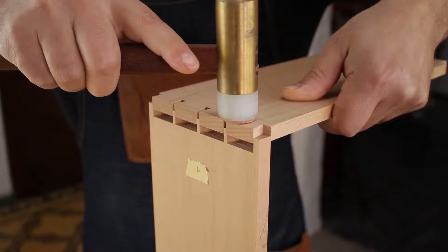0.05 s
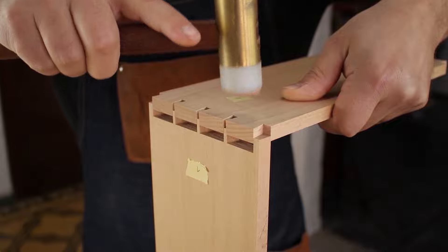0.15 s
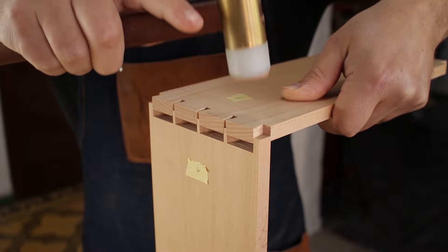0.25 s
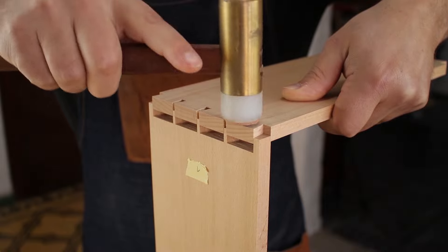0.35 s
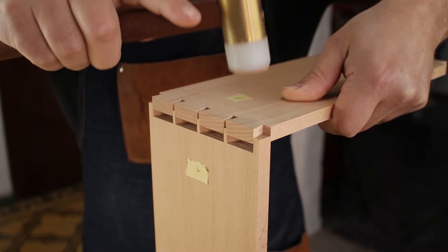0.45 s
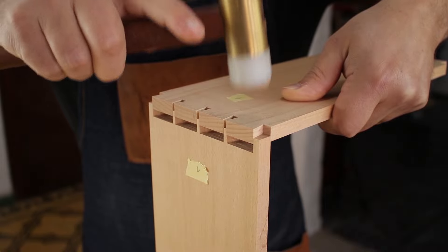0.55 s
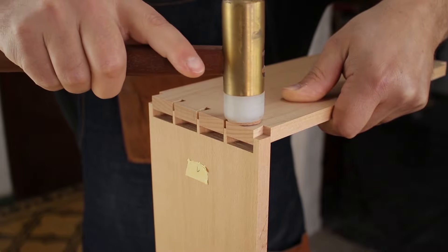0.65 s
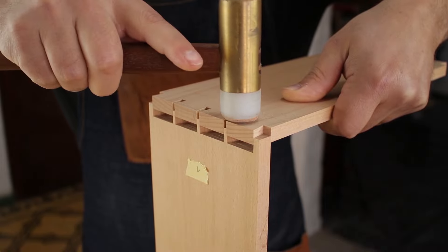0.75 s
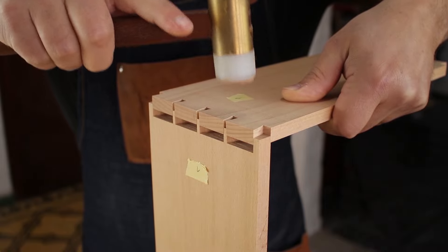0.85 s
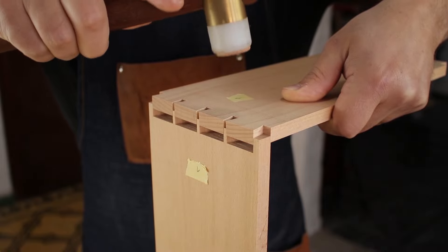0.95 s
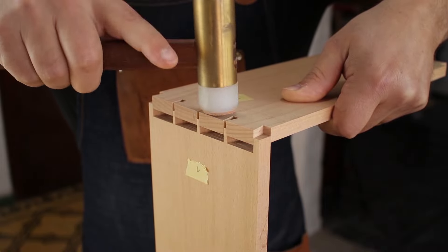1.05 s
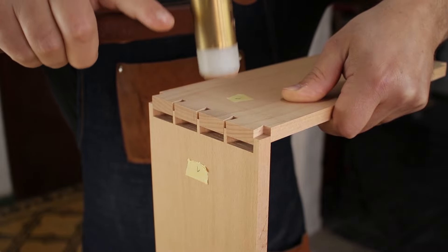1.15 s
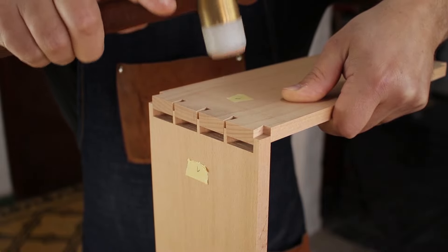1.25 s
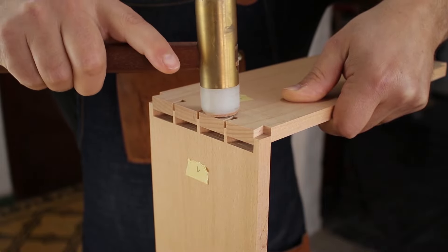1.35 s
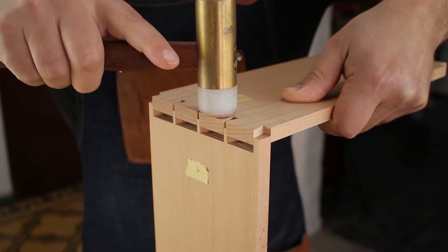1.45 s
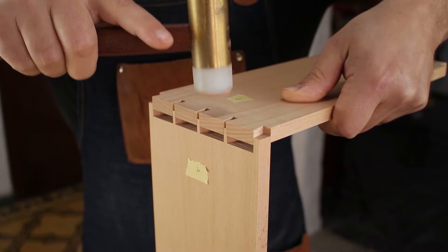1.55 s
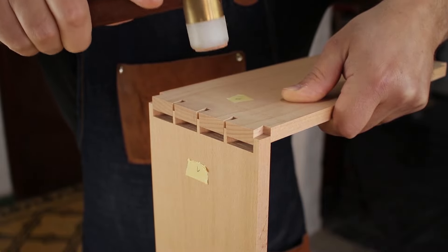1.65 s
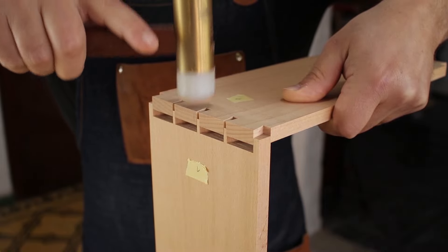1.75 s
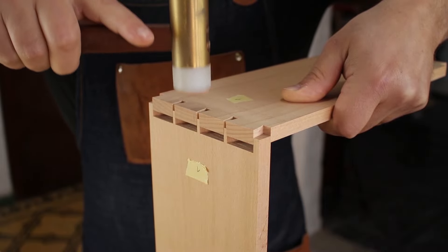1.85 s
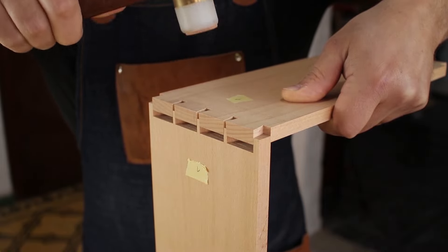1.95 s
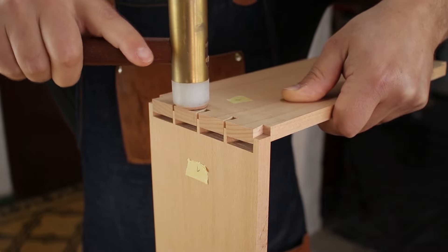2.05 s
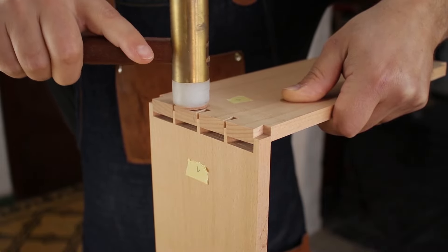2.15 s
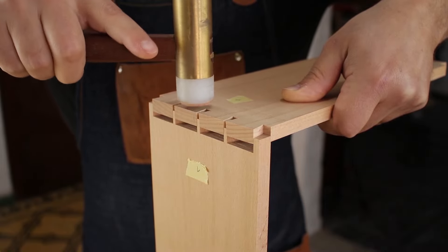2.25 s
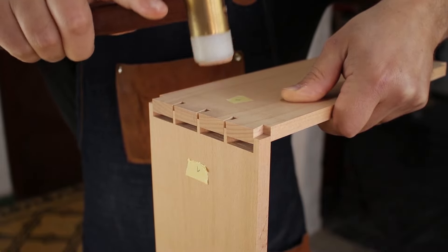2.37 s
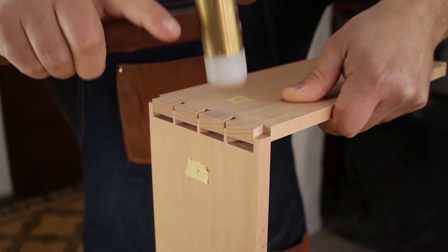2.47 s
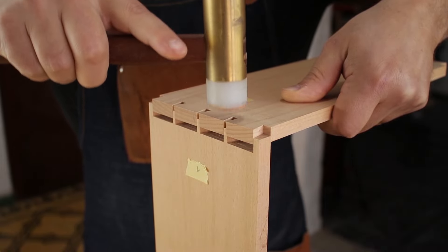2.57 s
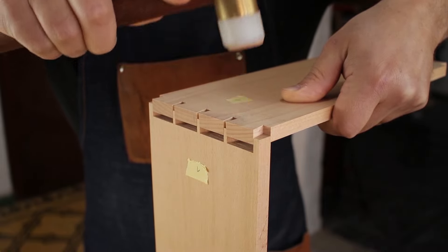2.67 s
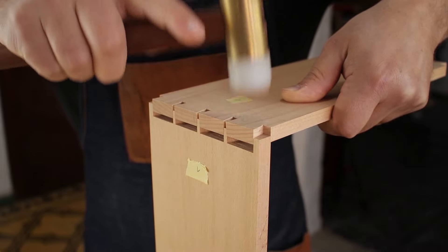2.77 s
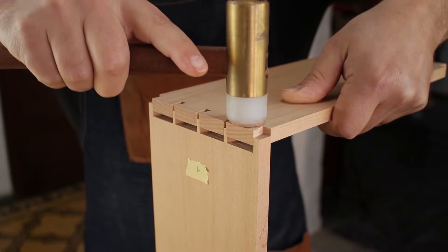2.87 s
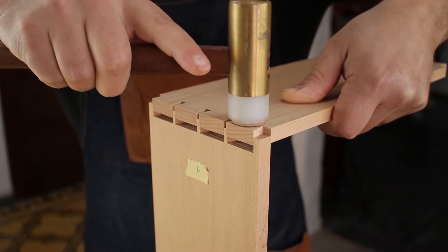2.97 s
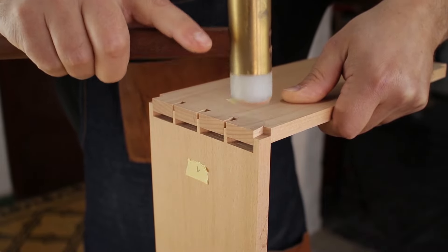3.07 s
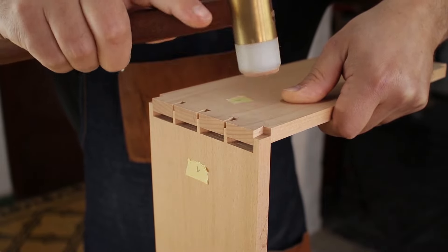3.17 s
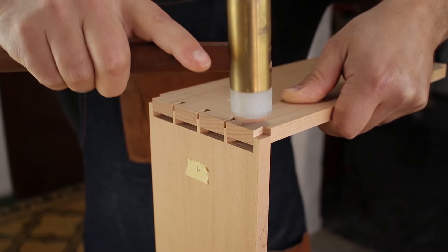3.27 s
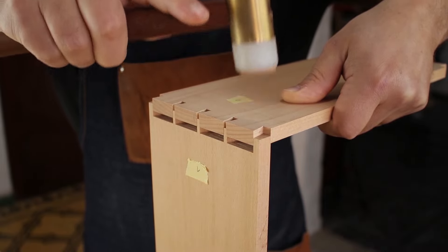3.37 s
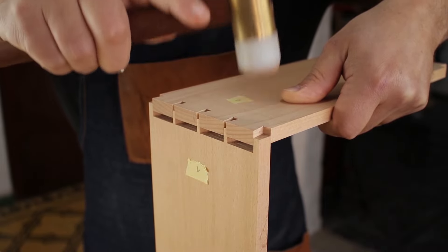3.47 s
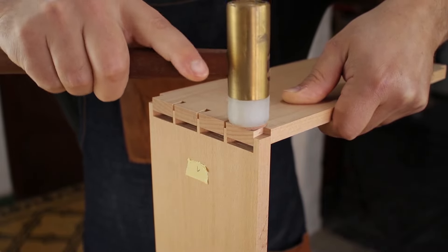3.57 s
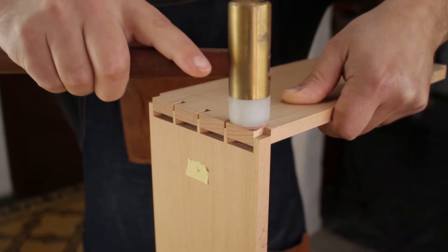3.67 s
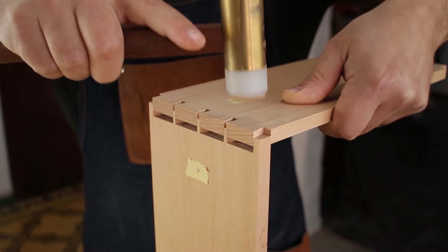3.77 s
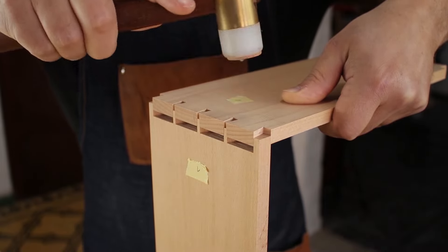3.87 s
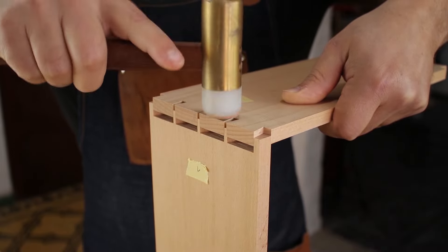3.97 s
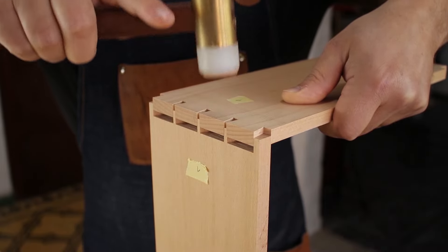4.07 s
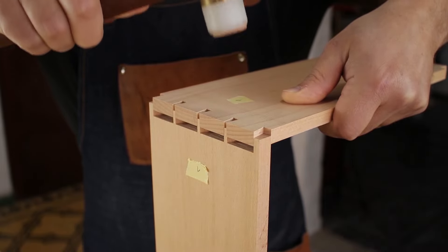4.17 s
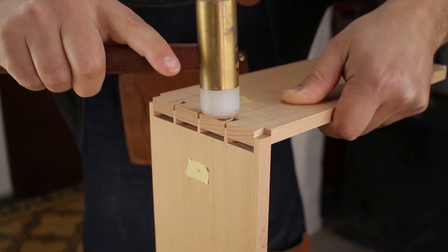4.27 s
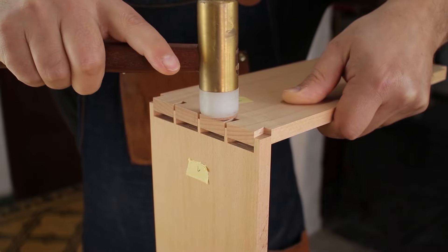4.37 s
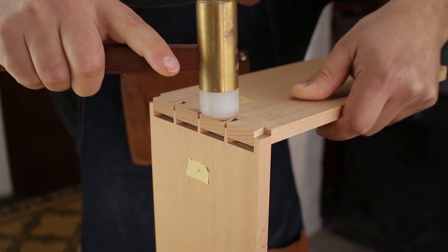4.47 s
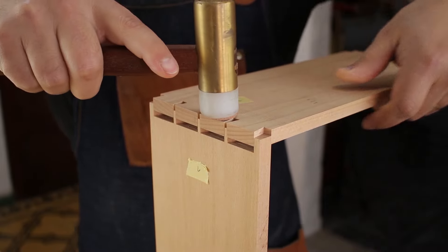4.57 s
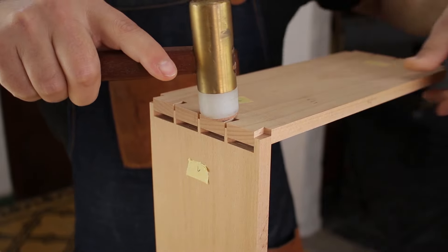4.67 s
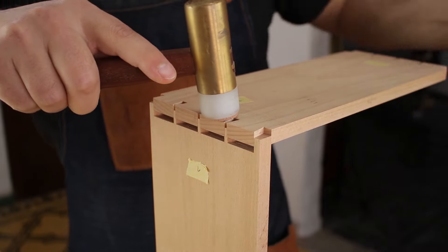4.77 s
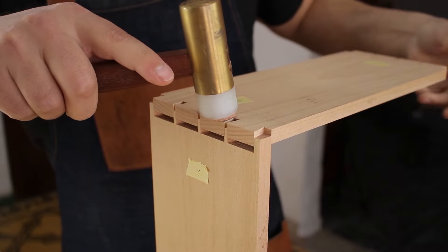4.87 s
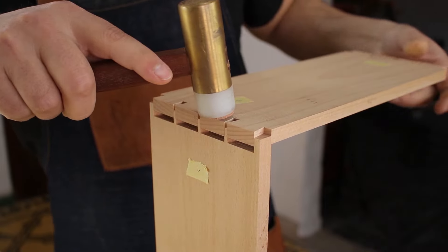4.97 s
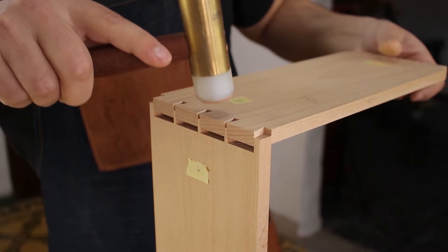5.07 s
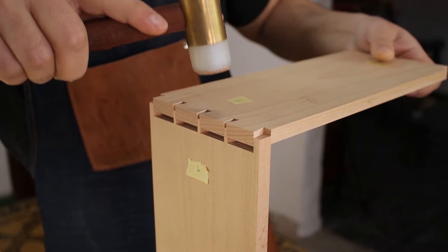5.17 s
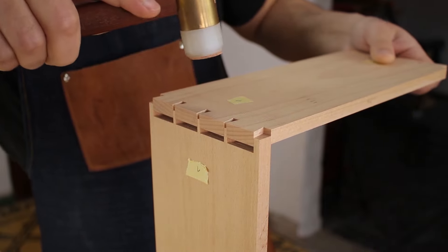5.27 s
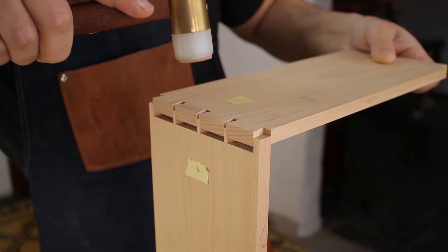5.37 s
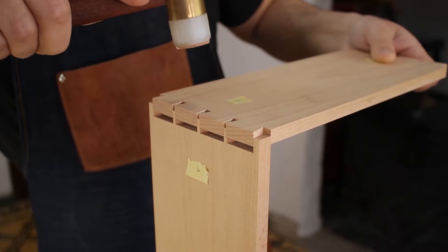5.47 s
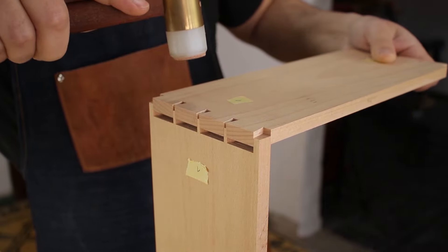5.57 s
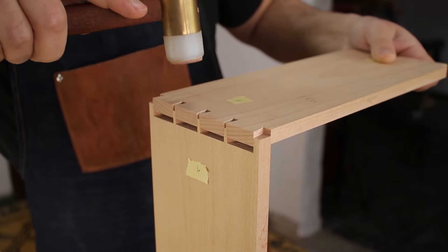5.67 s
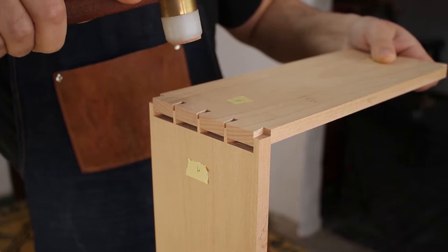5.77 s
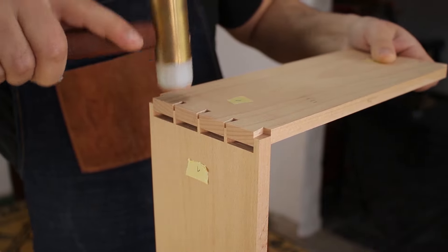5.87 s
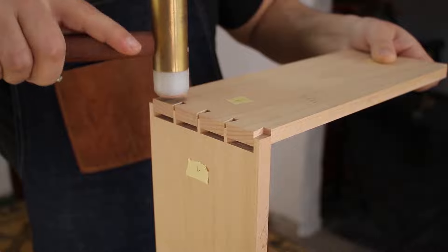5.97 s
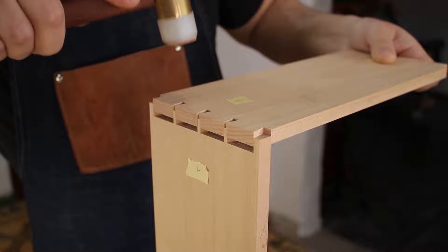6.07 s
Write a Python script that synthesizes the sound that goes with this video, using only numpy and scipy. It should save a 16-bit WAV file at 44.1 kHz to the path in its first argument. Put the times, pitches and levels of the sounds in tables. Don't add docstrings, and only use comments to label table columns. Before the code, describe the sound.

Close, loud mallet knocks on thin wooden boards in a bare, reverberant workshop. Thirteen or so blows come in a lopsided rhythm, alternating short and longer gaps, varying between hollow knock and bright snap, slightly clipped at the peaks. After the last strong hit the echo dies away, leaving soft room air and a far bird's tiny falling whistles, before a final lighter knock.

```python
import sys
import numpy as np
from scipy import signal
from scipy.fft import rfft, irfft
from scipy.io import wavfile
from scipy.ndimage import uniform_filter1d, map_coordinates

SR = 44100
rng = np.random.default_rng(int(sys.argv[2]) if len(sys.argv) > 2 else 0)


def elevation(decibels):
    levels = np.asarray(decibels, float)
    return 10 ** (levels / 20)


def unload_audio(sound):
    columns = np.transpose(np.atleast_2d(sound))
    steps = np.round(np.clip(columns, -1, 1) * 32767)
    wavfile.write(sys.argv[1], SR, steps.astype(np.int16))


N = 270333

# (frequency [Hz], t60 [s])
ROOM_DECAY = [(60, 0.81), (160, 1.2), (420, 1.003), (1100, 0.89), (2910, 0.82), (7680, 0.64), (14000, 0.36)]


def mallet(waves):
    # (time [s], force [dB], face snap over force [dB], joint modes over force [dB], tail pitch [Hz])
    blows = [(-.04, -15, 10, 6.5, 3730), (0.4091, -15.5, 9.5, 6, 3470), (0.6842, -14.5, 7.5, 8.5, 3220),
             (1.1347, -16, 9.5, 4.5, 3250), (1.4087, -12, 9.5, 5, 3300), (1.8695, -14, 2.5, 4.5, 3370),
             (2.155, -11.5, 3, 5, 2100), (2.6134, -16.5, 3, -2, 2685), (2.8983, -13.5, 10, 10, 3360),
             (3.3458, -12.5, -6.5, 1.5, 3195), (3.6134, -12.5, 11.5, 11, 3560),
             (4.0717, -16, 10.5, 3.5, 3260), (4.3423, -10.5, 8, 7, 3510), (5.9957, -21.5, 9.5, 12.5, 3150)]
    # (middle modes over force [dB], bench thud [dB], favoured deep mode [Hz],
    # first crack over snap [dB])
    spots = [(.6, -24.5, 310, -13), (1.2, -31.5, 370, -13.5), (2.2, -24, 350, -11.5), (11, -29, 295, -1.5)]
    out = np.zeros(N + 4 * SR)
    for k, (s, *how) in enumerate(blows):
        levels, landing, contact = strike(spots[k % len(spots)], s, *how)
        direct, spread = blow(levels, landing, contact)
        echo = elevation(1) * room(spread, waves)
        start = SR + round((s - 0.0008) * SR)
        out[start:start + len(direct)] += direct
        out[start:start + len(echo)] += echo
    return out[SR:SR + N]


def strike(spot, s, force_db, snap_db, joint_db, tail_hz):
    # (time [s], upper modes over force [dB], their favoured pitch [Hz], low knock [dB])
    looseness = [(0, 13, 1255, -4), (0.699, 10.5, 1320, -1.3), (1.3, 11.5, 1297, 2.4), (2.1, 7, 1370, -0.4),
                 (2.6, 11, 1380, -1.5), (3.5, 3.5, 1290, -2.5), (4.05, 6, 1237, -4.5), (4.35, 9, 1258, -5),
                 (6, 11.5, 1240, -12)]
    middle_db, thud_db, deep_hz, crack_db = spot
    times, *columns = np.transpose(looseness)
    upper_db, upper_hz, low_knock_db = [np.interp(s, times, c) for c in columns]
    levels = force_db + np.array([snap_db, 0, middle_db, upper_db, joint_db])
    face_hz = 2.5 * tail_hz
    landing = (thud_db, crack_db, deep_hz, upper_hz, tail_hz, face_hz)
    high_knock_db = -0.3 + 0.56 * levels[-1]
    low_knock_hz, contact_s = 1370, 0.0049
    contact = (low_knock_db, low_knock_hz, high_knock_db, tail_hz, contact_s)
    return levels, landing, contact


def blow(levels, landing, contact):
    # (frequency [Hz], level [dB], t60 [s])
    bench_modes = [(45, -9.5, 0.027), (83, -5, 0.12), (124.5, -3.5, .12)]
    deep_modes = [(244.1, 0.5, 0.074), (339, 3, 0.042), (387, -3, 0.1), (491, -7.5, 0.11), (590, -5, 0.04)]
    middle_modes = [(817.9, -5, 0.075), (910, -8, .04)]
    upper_modes = [(1245, -2, 0.021), (1330.4, -0.5, 0.022), (1389.5, -2.5, 0.038), (1616, 1.5, 0.019),
                   (1753, -4, 0.02)]
    joint_modes = [(2143, 3.5, 0.014), (2463, 5.5, 0.014), (2744, 2, 0.019), (3130, -5, 0.013),
                   (3510, -4.5, 0.038), (3697, 0.5, 0.019), (4010, 2, 0.011), (4330, -5.5, .025)]
    brass_modes = [(3480, -21, 0.12)]
    rattle_hz = [40, 300, 810, 1050, 1350, 1900, 3200, 8000, 16000]
    # (frequency [Hz], level [dB])
    beaming = [(100, 6), (240, -0.5), (400, 8.5), (810, 15.5), (1350, 6), (3500, 4)]
    snap_db, deep_db, middle_db, upper_db, joint_db = levels
    thud_db, crack_db, deep_hz, upper_hz, joint_hz, face_hz = landing
    groups = [
        (thud_db, bench_modes),
        (middle_db, middle_modes),
        (joint_db, brass_modes),
        (deep_db, favour(deep_modes, deep_hz, width_hz=110, depth_db=4)),
        (upper_db, favour(upper_modes, upper_hz, width_hz=75, depth_db=5)),
        (joint_db, favour(joint_modes, joint_hz, width_hz=300, depth_db=3)),
    ]
    modes = [(hz, db + group_db, t60) for group_db, group in groups for hz, db, t60 in group]
    t = np.arange(SR // 5) / SR
    f = np.fft.rfftfreq(len(t), 1 / SR)

    shades = [thud_db - 17.5, deep_db - 5, middle_db - 9, upper_db - 16, upper_db - 7,
              joint_db - 12, joint_db - 6, snap_db - 25, snap_db - 28]
    face_db = 3 * np.exp(-(np.log((f + 1) / face_hz) / 0.16) ** 2)
    ripple_db = 2.2 * map_coordinates(rng.standard_normal(60), [f / 450])
    ripple_db = ripple_db * (f > 1800) / (1 + (f / 12000) ** 2)
    density = elevation(along(list(zip(rattle_hz, shades)), f) + face_db + ripple_db)
    rattle = irfft(rfft(rng.standard_normal(len(t))) * density, len(t))
    pressed = elevation(20.5) * np.exp(-(t / contact[-1]) ** 4)
    rattle = rattle * (elevation(7 - 60 * t / 0.01) + pressed)

    crack = elevation(snap_db + crack_db - 60 * t / 0.01) * np.diff(rng.standard_normal(len(t) + 2), 2)
    crack = crack * (1 - np.exp(-t / 0.0002))
    load = 1 - np.exp(-(t / 0.0008) ** 3)
    beamed = [(hz, db + along(beaming, hz), 0.64 * t60) for hz, db, t60 in modes]
    direct = (ring(beamed, t, spread_db=1) + rattle + knock(t, *contact)) * load + crack

    power = (elevation(38.5) * density) ** 2
    for hz, db, t60 in modes:
        damping = np.log(1000) / t60
        power = power + (elevation(db) * SR / 2) ** 2 / (damping ** 2 + (2 * np.pi * (f - hz)) ** 2)
    bass_cut = (f / 75) ** 4 / (1 + (f / 75) ** 4)
    edges = bass_cut / (1 + (f / 15800) ** 90)
    return direct, causal(np.sqrt(power) * edges)


def favour(modes, near_hz, width_hz, depth_db):
    return [(hz, db - depth_db * (1 - np.exp(-((hz - near_hz) / width_hz) ** 2)), t60)
            for hz, db, t60 in modes]


def knock(t, low_db, low_hz, high_db, high_hz, length):
    tones = ring([(low_hz, low_db + 7.5, 0.06), (high_hz, high_db + 8, 0.04)], t, spread_db=0.5)
    return tones * np.exp(-(t / length) ** 4)


def ring(modes, t, spread_db):
    out = np.zeros(len(t))
    for hz, db, t60 in modes:
        decay = elevation(db + spread_db * rng.normal() - 60 * t / t60)
        out += decay * np.sin(2 * np.pi * (hz * t + rng.random()))
    return out


def room(x, waves):
    # (frequency [Hz], level [dB])
    echo_colour = [(150, 0.5), (500, 8), (2000, 2), (4300, 4), (5200, 1.5), (9000, 2), (16000, -0.5)]
    hz, t, z = signal.stft(rng.standard_normal(len(waves)), SR, nperseg=256)
    z = z * elevation(along(echo_colour, hz)[:, None] - 60 * t / along(ROOM_DECAY, hz)[:, None])
    tail = signal.istft(z, SR, nperseg=256)[1][:len(waves)] + waves
    t = np.arange(len(tail)) / SR
    tail = tail * (1 + 0.75 * elevation(-60 * t / 0.21))
    tail = tail * (1 - np.exp(-(t / 0.00085) ** 2))
    return signal.fftconvolve(x, tail / np.linalg.norm(tail))


def standing_waves():
    # (frequency [Hz], level [dB])
    room_tones = [(90, -27.5), (126, -32.5), (238, -31.5), (338, -30.5), (384, -28), (462, -29), (592, -31),
                  (807, -28.5), (830, -31), (1240, -31.5), (1328, -33), (1381, -32), (1557, -35.5),
                  (1792, -33.5)]
    t = np.arange(3 * SR // 2) / SR
    pairs = []
    for hz, db in room_tones:
        t60 = 1.12 * along(ROOM_DECAY, hz)
        pairs.append((hz, db, t60))
        pairs.append((hz + rng.uniform(-8.5, 9), db - 8, t60))
    fade = np.cos(np.pi / 2 * t / t[-1])
    return elevation(5) * ring(pairs, t, spread_db=1.6) * fade


def bird(waves):
    # (time [s], length [s], start pitch [Hz], end pitch [Hz], level [dB])
    whistles = [
        (5.519, .06, 4710, 4610, -75),
        (5.625, .06, 3850, 3560, -65),
        (5.617, 0.081, 3400, 3050, -72),
        (5.693, .1, 4144, 3300, -76),
    ]
    t, out = np.arange(N) / SR, np.zeros(N)
    for s, length, hz0, hz1, db in whistles:
        u = np.clip((t - s) / length, 0, 1)
        burr_hz = 60 + 0.55 * (hz0 - hz1)
        burr = burr_hz * unit(uniform_filter1d(rng.standard_normal(N), size=50))
        pitch = hz0 + (hz1 - hz0) * u + burr
        out += elevation(db) * np.sin(np.pi * u) * np.sin(2 * np.pi * np.cumsum(pitch) / SR)
    return 0.5 * out + room(out, waves)[:N]


def hush():
    # (frequency [Hz], level [dB per Hz])
    hush_colour = [(25, -24.5), (60, -6), (250, -0.5), (700, -14), (1250, -13.5), (4000, -22.5),
                   (5000, -31), (16000, -42)]
    return elevation(-67) * coloured(hush_colour, N)


def unit(x):
    return x / np.sqrt(np.mean(x ** 2) + 1e-20)


def along(points, hz):
    f, v = np.transpose(points)
    return np.interp(np.log(hz + 1), np.log(f + 1), v)


def coloured(points, count):
    hz = np.fft.rfftfreq(count, 1 / SR)
    return unit(irfft(rfft(rng.standard_normal(count)) * elevation(along(points, hz)), count))


def causal(gain):
    cepstrum = irfft(np.log(gain + 1e-5))
    half = len(cepstrum) // 2
    cepstrum[1:half] *= 2
    cepstrum[half + 1:] = 0
    return irfft(np.exp(rfft(cepstrum)))


def scene():
    waves = standing_waves()
    return (mallet(waves) + bird(waves) + hush())[None]


def top_cut(x):
    return signal.sosfilt(signal.butter(12, 16480, fs=SR, output="sos"), x)


def record(dry):
    knee = 11
    clipped = dry / (1 + np.abs(dry) ** knee) ** (1 / knee)
    band = signal.butter(12, 16000, fs=SR, output="sos")
    return top_cut(signal.sosfiltfilt(band, clipped))


dry = scene()
out = record(dry)
unload_audio(out)
```